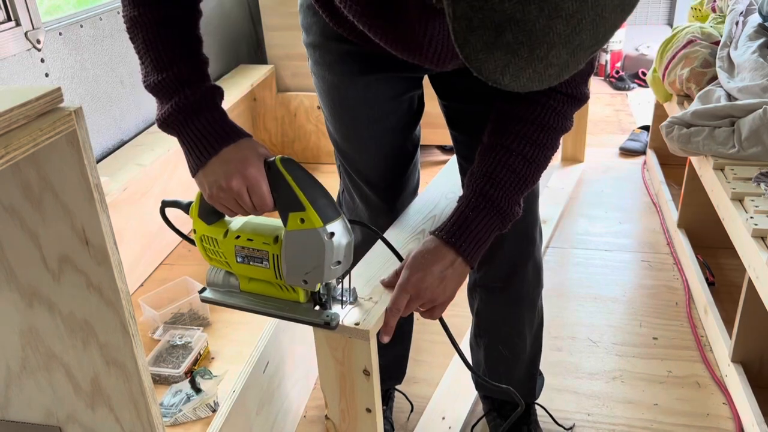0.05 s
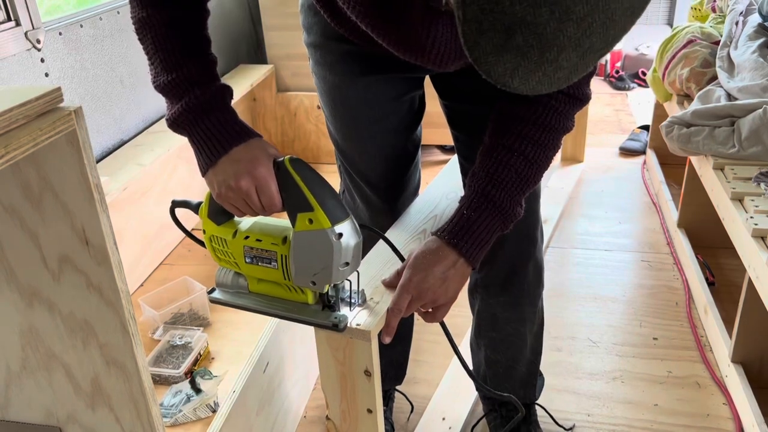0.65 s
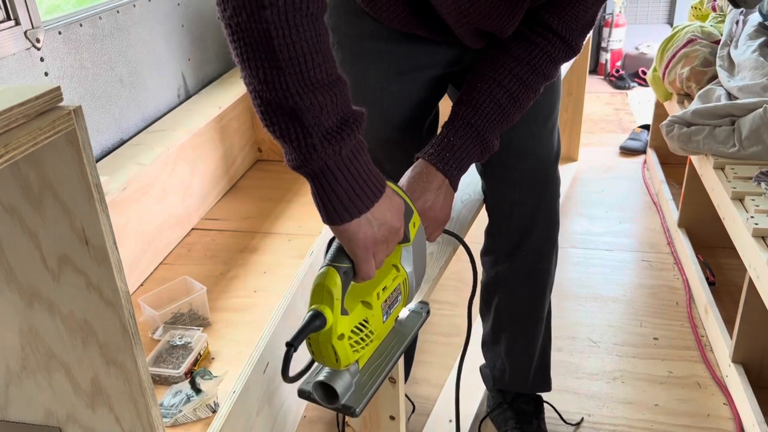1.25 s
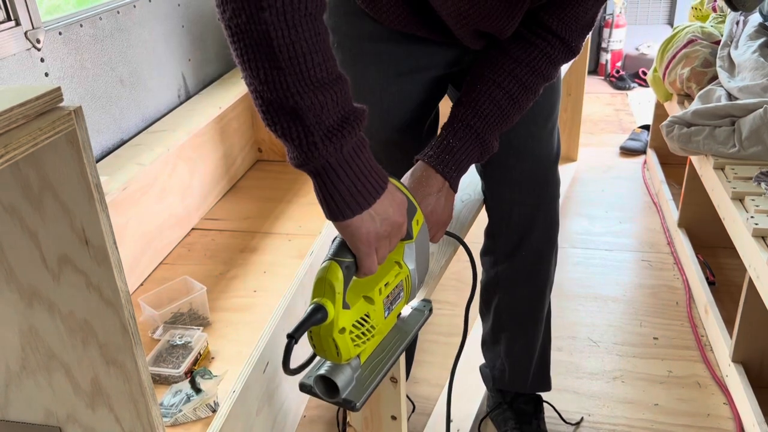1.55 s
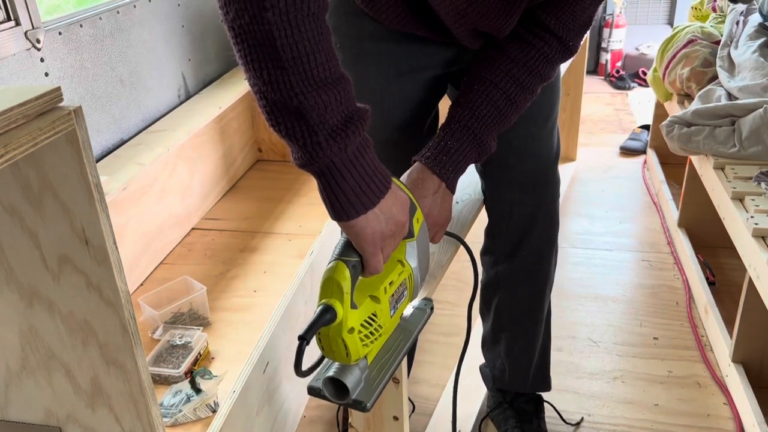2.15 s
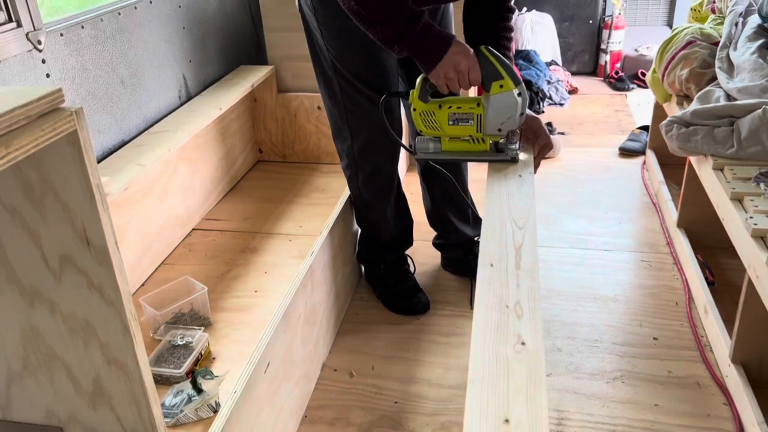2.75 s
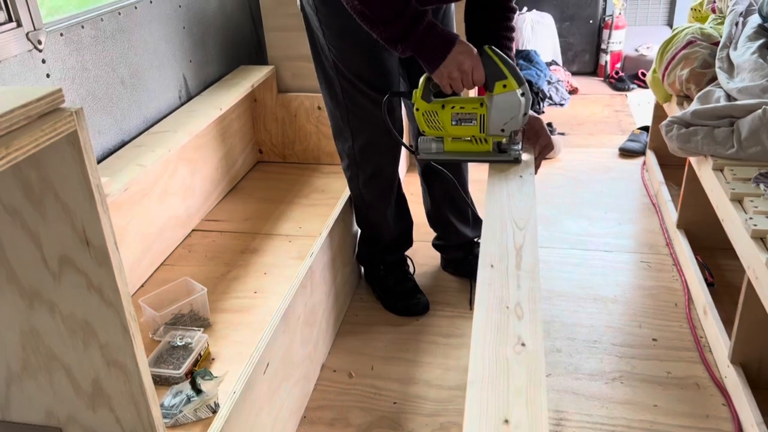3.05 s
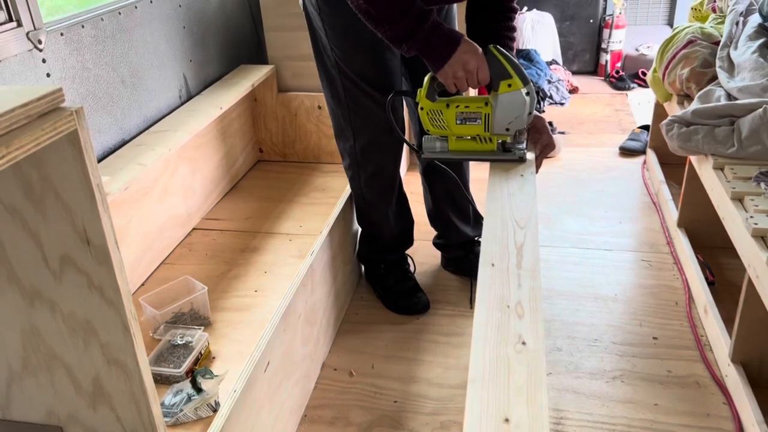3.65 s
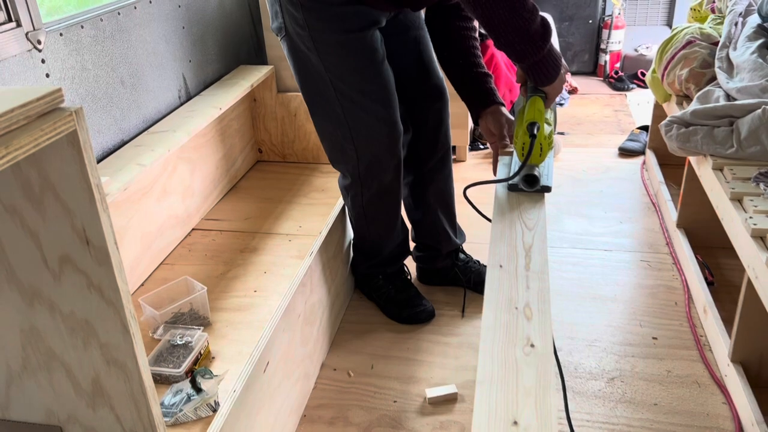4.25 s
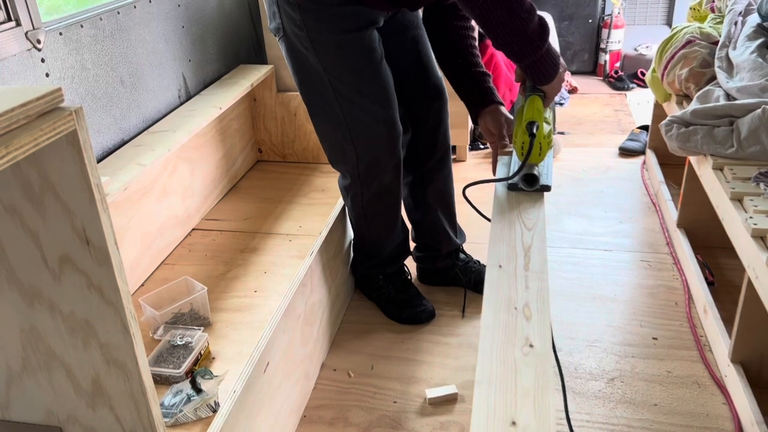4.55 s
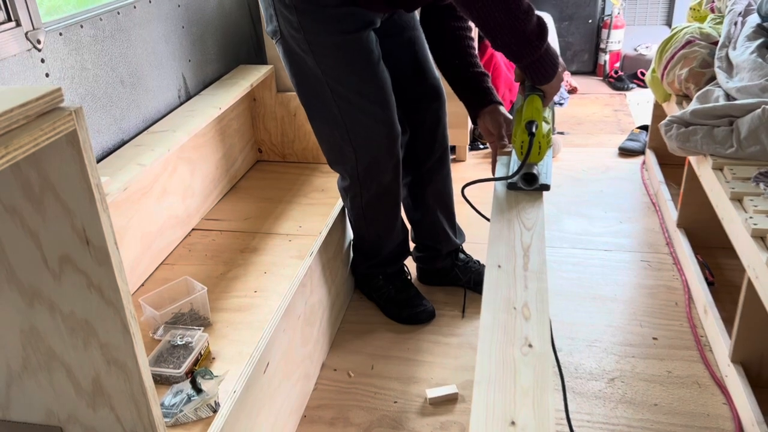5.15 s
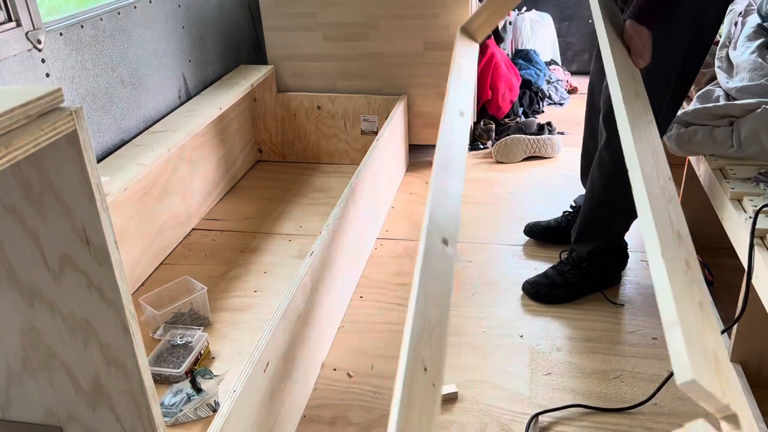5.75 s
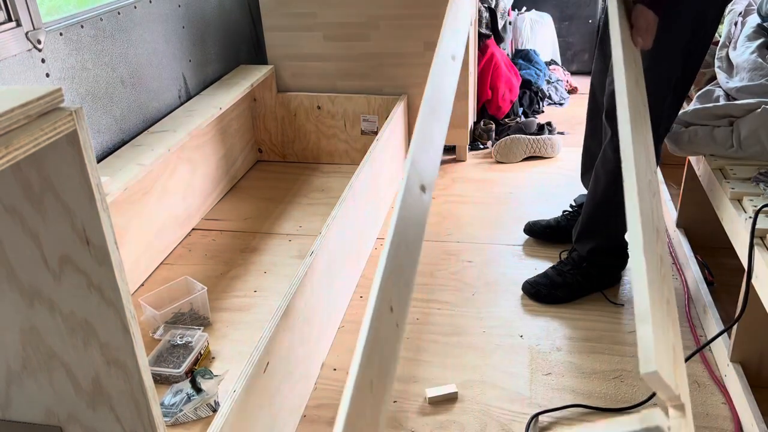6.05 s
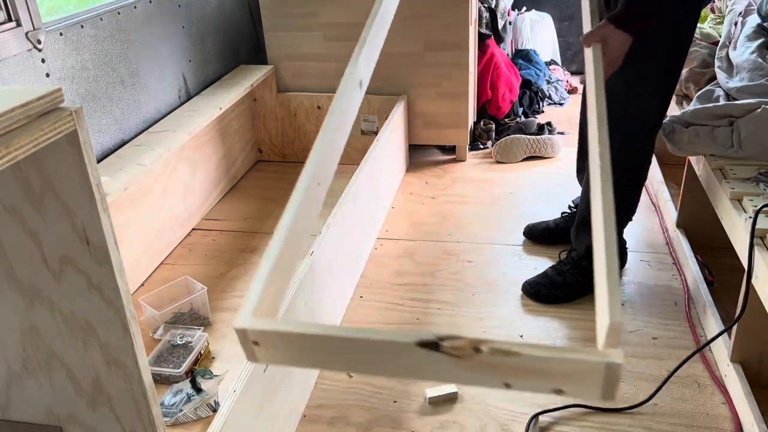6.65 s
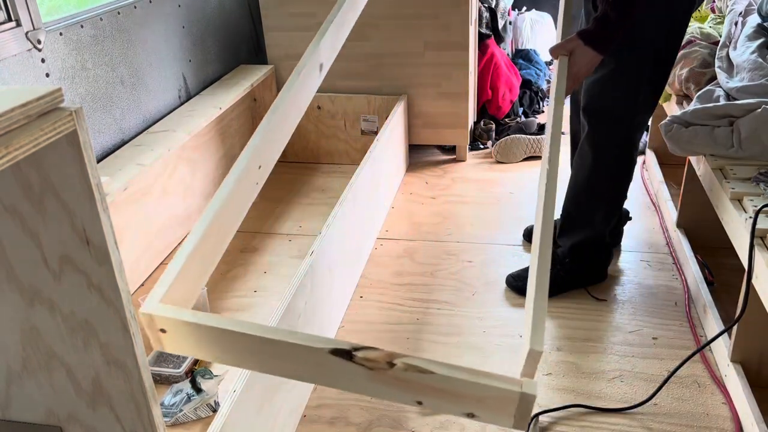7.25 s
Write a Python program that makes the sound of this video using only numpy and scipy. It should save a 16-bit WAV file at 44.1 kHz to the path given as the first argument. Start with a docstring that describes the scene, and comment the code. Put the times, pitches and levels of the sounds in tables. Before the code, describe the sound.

An electric jigsaw cuts a board with a rattling whine, stops, and wood slides and bumps against wood indoors.

```python
"""A corded jigsaw buzzes through softwood in a small plywood-lined room, in four stretches joined by short
fades. Each stroke of the blade rattles the drive and shakes the board; the teeth rasp, the fan hisses
and the motor whines. Then a wooden frame is slid and lifted: it scuffs and creaks as wood rubs on wood,
thuds on the hollow floor and knocks against the woodwork."""
import sys
import numpy as np
from scipy import signal
from scipy.fft import rfft, irfft
from scipy.io import wavfile
from scipy.ndimage import uniform_filter1d

SR = 44100
rng = np.random.default_rng(int(sys.argv[2]) if len(sys.argv) > 2 else 0)


def master_out(mix):
    """Clip the mix to full scale and print it as 16-bit PCM to the path in sys.argv[1]."""
    frames = np.transpose(np.atleast_2d(mix))
    ceiling = np.clip(frames, -1, 1)
    pcm = np.round(ceiling * 32767).astype(np.int16)
    wavfile.write(sys.argv[1], SR, pcm)


N = 326340
T = np.arange(N) / SR

# tones of the motor: multiple of its spin rate, then peak_db in each of the four stretches
MOTOR_TONES = [(4, -46, -34, -38, -39), (8, -56, -43, -43, -45), (16, -43, -30.5, -36.5, -38),
               (24, -38, -42, -47, -43), (30, -33.5, -38, -35, -35)]


def undb(db):
    """Turn decibels into a gain."""
    return 10 ** (np.asarray(db) / 20)


def unit(x):
    """Scale a sound to an average (rms) level of 1."""
    return x / np.sqrt(np.mean(x ** 2) + 1e-20)


def colour(x, points):
    """Shape the tone with a curve of (pitch_hz, level_db) points."""
    hz, db = np.transpose(points)
    bins_hz = np.maximum(np.arange(len(x) // 2 + 1) * SR / len(x), 1)
    return irfft(rfft(x) * undb(np.interp(np.log(bins_hz), np.log(hz), db)), len(x))


def band(x, hz, kind, order=2):
    """Keep the lows, the highs or a band in between."""
    return signal.sosfilt(signal.butter(order, np.clip(hz, 10, .45 * SR), kind, fs=SR, output="sos"), x)


def drift(rate_hz):
    """A smooth random wander, roughly 1 either way."""
    hold = int(SR / rate_hz)
    steps = np.repeat(rng.standard_normal(N // hold + 1), hold)
    return 1.3 * uniform_filter1d(steps, hold)[:N]


def bump(middle_s, half_width_s):
    """A smooth rise to 1 and back."""
    return np.exp(-((T - middle_s) / half_width_s) ** 2)


def dense_ring(ring_s):
    """Countless overlapping tones ring like noise, falling 60 dB in ring_s."""
    t = T[:SR // 2]
    ring = rng.standard_normal(len(t)) * undb(-60 * t / ring_s)
    return ring / np.linalg.norm(ring)


def clear_ring(tones):
    """A few clear tones ring, each falling 60 dB in its ring_s."""
    t = T[:SR]
    ring = sum(undb(db - 60 * t / ring_s) * np.sin(2 * np.pi * (hz * t + rng.random()))
               for hz, db, ring_s in tones)
    return ring / np.linalg.norm(ring)


def through(x, ring):
    """Let x set something ringing."""
    return signal.oaconvolve(x, ring)[:len(x)]


def strokes(turns, share, jitter_s, scatter_db):
    """One slightly uneven blow per stroke, a given share of the way in; turns counts the strokes."""
    times = np.interp(np.arange(int(turns[-1]) - 1) + share, turns, T)
    late, size = rng.standard_normal((len(times), 2)).T
    blows = np.zeros(N)
    blows[np.clip((times + jitter_s * late) * SR, 0, N - 1).astype(int)] = undb(scatter_db * size)
    return blows


def shoe_slaps(turns):
    """The shoe, the saw's base plate, slaps the board dully twice a stroke."""
    # slaps: share_of_stroke, level_db
    slaps = [(.15, -5), (.62, -1.5)]
    blows = sum(undb(db) * strokes(turns, share, jitter_s=.0002, scatter_db=3) for share, db in slaps)
    return unit(band(blows, [180, 520], "band"))


def rattle(turns, ring_s=0.045):
    """Each impact rings its own part of saw and board; the ring changes as the blade travels."""
    # blade reversals, shoe slap and loose gears: share_of_stroke, level_db
    impacts = [(.05, -3.5), (0.239, -10), (.43, -6), (.58, -11.5), (.8, -4.5)]
    out = 0
    for share, db in impacts:
        blows = undb(db) * strokes(turns, share, jitter_s=.00004, scatter_db=2)
        blend = drift(3.5) + T
        for weight in (np.cos(blend), np.sin(blend)):
            out = out + through(blows * weight, dense_ring(ring_s))
    return unit(out)


def rasp(turns, grain_db=2.5, return_stroke=0.76, snaps_per_s=4500, ring_s=0.0082):
    """Teeth snap wood fibres in tiny bursts, hardest where the blade moves fastest on the upstroke."""
    drag, chatter_db = .5, 1.5
    blade = np.sin(2 * np.pi * turns)
    bite = (drag + np.maximum(blade, -return_stroke * blade)) * undb(chatter_db * drift(45))
    snaps = (rng.random(N) < snaps_per_s / SR) * undb(grain_db * np.minimum(rng.exponential(size=N), 4))
    decay = np.exp(-2 * np.log(1000) / (ring_s * SR))
    power = signal.lfilter([1], [1, -decay], (snaps * bite) ** 2)
    return unit(np.sqrt(power) * rng.standard_normal(N))


def whine(turns, gear_ratio=31 / 4, flutter_db=2.2):
    """The spinning motor's fluttering tones, one row each, slightly blurred by loose gears."""
    # two tones flare up and sink: middle_s, half_width_s, multiple_16_change_db, multiple_30_change_db
    flares = [(.23, .1, 11, 0), (.44, .12, 15.5, 1), (.88, .12, 0, 4), (1.07, .07, -5, 0),
              (1.26, .05, 6.5, 3), (1.36, .05, 0, 11), (1.53, .1, 6, 2), (2.12, .08, 2.5, 0),
              (2.5, .07, 0, 11), (3.65, .33, 0, 6.5), (4.62, .15, 7, 6), (5.33, .25, 1, 6.5)]
    spins = gear_ratio * turns + .003 * drift(70)
    flare_db = np.zeros((len(MOTOR_TONES), N))
    flare_db[[2, 4]] = sum(np.outer(db, bump(at, half_width)) for at, half_width, *db in flares)
    tones = [np.sin(2 * np.pi * multiple * spins) * undb(flutter_db * drift(110))
             for multiple, *_ in MOTOR_TONES]
    return np.array(tones) * undb(flare_db)


def vent_hiss(fan, teeth, clatter):
    """The fan's rushing air mixes with the treble of the rasp and rattle."""
    # tone of the hiss: pitch_hz, level_db
    hiss_curve = [(3000, -7), (4400, .5), (6100, 2.5), (7200, -2), (8600, 3.5), (9300, 1.5), (10500, -6),
                  (11500, -2.5), (13000, -8), (15500, -8)]
    return unit(band(colour(fan + 0.79 * teeth + 0.13 * clatter, hiss_curve), 4400, "high"))


def singing(drive, spans, swell_share=0.18, waver_db=1.5):
    """Narrow bands of a driving sound swell, waver and die away, each in its own time span."""
    out = 0
    for start, end, hz, width, db in spans:
        age = (T - start) / (end - start)
        fade = np.clip(np.minimum(age, 1 - age) / swell_share, 0, 1)
        ring = band(drive, [hz - width / 2, hz + width / 2], "band")
        out = out + undb(db + waver_db * drift(15)) * fade * ring / np.std(ring[fade > 0])
    return out


def blade_song(turns):
    """The blade jerks once a stroke and scrapes in between, making itself and the board sing."""
    # ringing of blade and board: start_s, end_s, pitch_hz, width_hz, level_db
    rings = [(-.15, 1, 1230, 110, -28.5), (.3, 1.05, 5770, 240, -32.5), (.95, 1.7, 2535, 55, -27.5),
             (1.0, 1.8, 3050, 70, -29.5), (1.3, 2.7, 3305, 20, -33), (1.4, 2.7, 565, 110, -39),
             (1.33, 1.55, 1430, 120, -25.5), (1.55, 2.05, 1085, 100, -27.5), (1.88, 2.25, 1200, 170, -26.5),
             (2.17, 2.32, 980, 160, -25), (2.2, 2.55, 2510, 160, -30), (2.2, 2.65, 1620, 200, -28),
             (2.45, 4.3, 1165, 55, -28.5), (3.33, 3.49, 1570, 200, -24.5), (3.35, 3.65, 2230, 170, -31),
             (3.58, 3.8, 1570, 90, -24.5), (4.5, 5.3, 1270, 80, -25.5), (4.45, 5.7, 1340, 25, -28),
             (4.3, 5.4, 3120, 90, -33), (5.38, 5.62, 1380, 420, -23)]
    jerks = unit(strokes(turns, share=.45, jitter_s=.00006, scatter_db=2.5))
    return singing(.8 * jerks + rasp(turns), rings)


def board_shake(turns, tones, deep_db, upper_db, third_db, smear, waver_db=1.4):
    """Every stroke kicks the board once; smear makes its higher tones answer a little later."""
    waves = [undb(db + waver_db * drift(40)) * np.sin(2 * np.pi * (multiple * turns - smear * multiple ** 2))
             for multiple, db in tones]
    upper = (waves[2] * undb(third_db) + sum(waves[3:])) / np.std(sum(waves[2:]))
    return unit(sum(waves[:2])) * undb(deep_db) + upper * undb(upper_db)


def effort(stretch, middle_s, speed_lost):
    """Levels of cutting, hiss and board shake: a slowed blade works less hard, and catches swing them."""
    # each stretch at full speed: cut_db, hiss_db, deep_shake_db, upper_shake_db, slope_db_per_s
    levels = [(-17.5, -20.5, -40, -27, -1), (-15, -20, -31.5, -27, -1.96), (-17.5, -25.5, -28.5, -23, 0),
              (-17, -25, -31, -24.5, 0)]
    # the blade catches and the board shifts: middle_s, half_width_s,
    # then changes to cut_db, deep_shake_db, upper_shake_db, third_tone_db
    catches = [(.06, 0.077, 0.5, -2, 1.5, 0), (.12, 0.28, 0, 6, 2, 3), (1.22, 0.39, 0, -1.5, -5, 6.5),
               (1.619, 0.088, 0, 4, 2, -17), (3.42, 0.066, 0.5, -0.5, 0, -1.5),
               (4.36, 0.21, -0.5, 1.5, 2.5, -7), (4.85, 0.22, 0, 3, -3, 4),
               (5.38, 0.055, -1.5, -4, 4, -1.5), (5.49, 0.026, 1, 4, 3, 0)]
    cut_db, hiss_db, deep_db, upper_db, slope = levels[stretch]
    swings = sum(np.outer(db, bump(at, half_width)) for at, half_width, *db in catches)
    cut_swing, deep_swing, upper_swing, third_db = swings
    cut_sag_db, deep_sag_db = 0.8 * speed_lost, 2.5 * speed_lost
    work_db = slope * (T - middle_s) - cut_sag_db
    shake_db = (deep_db - deep_sag_db + deep_swing, upper_db + upper_swing, third_db)
    return cut_db + work_db + cut_swing, hiss_db + work_db, shake_db


def widen(x, width_db=0, walls_ring_s=0.2):
    """Echoes from close walls reach the left and right ears differently."""
    # how much of the echo differs between the ears: pitch_hz, level_db
    width_curve = [(40, -36.5), (90, -16.5), (180, -20.5), (350, -11.5), (700, -3.5), (1400, -9),
                   (2800, -3), (6000, -2.5), (14000, -0.5)]
    side = undb(width_db) * colour(through(x, dense_ring(walls_ring_s)), width_curve)
    return x + side * np.array([[1], [-1]])


def lean_left(ears, pan_db):
    """The vent aims its hiss to the left, so that ear gets more, mostly in the treble."""
    # lean to the left: pitch_hz, multiple of pan_db
    beam = [(60, 0), (300, .7), (2400, .6), (4400, 3.3), (8000, 1), (15000, 0)]
    return np.array([colour(x, [(hz, side * multiple * pan_db / 2) for hz, multiple in beam])
                     for x, side in zip(ears, (1, -1))])


def jigsaw(fade_in_s=0.049, fade_out_s=0.041):
    """Rattle, rasp and fan sound through saw and board, along with the shake, slaps and whine."""
    # the motor slows whenever the blade is pushed in: time_s, strokes_per_s
    speeds = [(0, 49.7), (.15, 48.8), (.35, 48.65), (.72, 49.1), (.9, 49.95), (1.03, 48.6), (1.3, 50.67),
              (1.5, 51.4), (1.75, 51.66), (2.57, 51.46), (2.58, 50.9), (3.1, 50.75), (3.6, 50.69),
              (4.14, 50.82), (4.15, 49.35), (4.45, 51.15), (4.8, 51.62), (5.3, 51.46), (5.5, 51.68)]
    # stretches of sawing: start_s, end_s, rattle_db, rasp_db, fan_db, shoe_db, smear_cycles, pan_db
    stretches = [(-.05, 1.021, -1.5, -6, -1.5, -37, 0.081, 3),
                 (1.006, 2.583, -3.5, -8, -5.5, -41.5, 0.099, 1.7),
                 (2.575, 4.149, 2, -1.5, -4, -40, 0.0246, 0.5),
                 (4.141, 5.583, -2.5, -5, -5.5, -48, 0.1, 0.9)]
    # tone of saw and board, one list per stretch: pitch_hz, level_db
    body_curves = [
        [(300, -10), (520, -10), (610, -13.5), (720, -5), (870, -7), (1020, -3.5), (1300, -4), (1590, -7),
         (2690, -8), (3060, -7), (3550, -8.5), (5500, -5)],
        [(300, -11.5), (480, -12.5), (570, -8), (840, -3), (970, 2), (1300, -1.5), (1610, -1), (1820, -1),
         (2010, -5), (2550, -1.5), (2800, -5), (3060, -2), (3550, -4), (4340, 0), (5500, -6)],
        [(300, -16), (440, -21), (530, -10.5), (670, -13.5), (1020, -4.5), (1270, -4.5), (1590, -4.5),
         (1800, -4.5), (2050, -8.5), (2240, -4.5), (2500, -11), (2770, -6), (3000, -8), (3360, -9),
         (5500, -3.5)],
        [(300, -21.5), (370, -14.5), (520, -13.5), (850, -11), (930, -5.5), (1480, -4.5), (1620, -3.5),
         (1850, -4.5), (2740, -9), (3120, -5), (3480, -10), (3960, -5.5), (5500, -4)],
    ]
    # tones of the shaking board, one list per stretch: multiple of the stroke rate, level_db
    shake_tones = [
        [(1, -28), (2, -30), (3, -4.5), (4, -18), (5, -5)],
        [(1, -3.5), (2, -5), (3, 5), (4, 5), (5, -7.5)],
        [(1, -7), (2, -14.5), (3, 4.5), (4, -2), (5, 1.5), (6, -11.5), (7, -30), (8, -20), (11, -4)],
        [(1, -14), (2, -14), (3, 4.5), (4, 4.5), (5, 0.5), (7, -12.5), (8, -18)],
    ]
    speed = np.interp(T, *np.transpose(speeds))
    turns = np.cumsum(speed) / SR
    slaps, clatter, teeth = shoe_slaps(turns), rattle(turns), rasp(turns)
    fan, motor = rng.standard_normal(N), whine(turns)
    hiss, song = vent_hiss(fan, teeth, clatter), blade_song(turns)
    motor_db = np.transpose(MOTOR_TONES)[1:]
    out = 0
    for i, (start, end, rattle_db, rasp_db, fan_db, shoe_db, smear, pan_db) in enumerate(stretches):
        cut_db, hiss_db, shake_db = effort(i, (start + end) / 2, speed.max() - speed)
        body = undb(rattle_db) * clatter + undb(rasp_db) * teeth + undb(fan_db) * fan
        body = band(colour(body, body_curves[i]), 160, "high")
        body = unit(band(body, 3320, "low", order=3))
        saw = body * undb(cut_db) + hiss * undb(hiss_db) + slaps * undb(shoe_db) + song
        saw = saw - board_shake(turns, shake_tones[i], *shake_db, smear) + undb(motor_db[i]) @ motor
        fade = np.clip((T - start) / fade_in_s, 0, 1) * np.clip((end - T) / fade_out_s, 0, 1)
        out = out + lean_left(widen(saw), pan_db) * fade
    return out


def room_hush(level_db=-65):
    """The faint, low, steady noise of the room."""
    # tone of the hush: pitch_hz, level_db
    hush_curve = [(30, -2.5), (400, -20.5), (1500, -24.5), (5000, -31), (14000, -49)]
    return unit(colour(rng.standard_normal(N), hush_curve)) * undb(level_db)


def push(start, end, rise_s=0.029, fall_db_per_s=159):
    """Loudness of one push: a quick rise, a hold and a steady fall."""
    return np.clip((T - start) / rise_s, 0, 1) * undb(-fall_db_per_s * np.maximum(T - end, 0))


def sliding(grain_db=1.0):
    """The frame rubs wood on wood, catching unevenly on the grain."""
    # pushes of the frame: start_s, end_s, hiss_db, scuff_db
    pushes = [(5.54, 5.68, -66, -56), (5.682, 5.763, -58.5, -52.5), (5.96, 6.097, -68, -70),
              (6.04, 6.097, -68, -57), (6.113, 6.372, -48, -76), (6.307, 6.415, -66, -52),
              (6.604, 6.66, -60.5, -66), (6.697, 6.783, -51, -44), (6.829, 6.866, -53, -49.5),
              (7.05, 7.33, -81, -69.5)]
    # tone of the bright hiss and of the low scuff: pitch_hz, level_db
    hiss_curve = [(1500, -7), (3300, -3), (5800, 2), (8500, -2), (12000, -19), (15500, -28)]
    scuff_curve = [(60, -15.5), (220, -8.5), (330, -11.5), (520, -11), (900, -18.5), (1500, -15.5),
                   (3500, -23), (6000, -39.5)]
    power = sum(np.outer(undb(db), push(start, end)) ** 2 for start, end, *db in pushes)
    hiss_gain, scuff_gain = np.sqrt(power)
    hiss = unit(colour(rng.standard_normal(N), hiss_curve)) * hiss_gain
    scuff = unit(colour(rng.standard_normal(N), scuff_curve)) * scuff_gain
    return (hiss + scuff) * undb(grain_db * drift(180))


def thuds(floor_db=25):
    """Blows give short, dry booms in the hollow floor; the last ones are deepest and dullest."""
    # blows on the floor: start_s, strength_db, highest_hz
    blows = [(5.725, -40, 696), (6.738, -30.5, 700), (6.786, -29, 500), (6.919, -41, 200),
             (7.105, -38.5, 300), (7.128, -30.5, 350), (7.15, -34.5, 170), (7.194, -28.5, 89.6),
             (7.234, -41, 80.6)]
    # tones of the floor: pitch_hz, level_db, ring_s
    floor_tones = [(55, -6, 0.26), (78.5, 0, 0.26), (120.5, -6, 0.1), (172, 3, 0.11), (290, -1, 0.06),
                   (375, -2, .06)]
    force = sum(undb(db + floor_db) * band(signal.unit_impulse(N, int(start * SR)), top_hz, "low")
                for start, db, top_hz in blows)
    return through(force, clear_ring(floor_tones))


def contact(start, low_hz, high_hz, length_s, tap=.35, rise_share=.3):
    """Wood meets wood: a small tap, then a crunch of fibres that builds and dies."""
    age = np.maximum(T - start, 0) / length_s
    force = rng.standard_normal(N) * (1 - np.exp(-age / rise_share)) * np.exp(-age)
    force = force / np.linalg.norm(force)
    force[int(start * SR)] += tap
    force = band(force + 1e-18, [low_hz, high_hz], "band")
    return force / np.linalg.norm(force)


def knocks(tones_db=13, body_db=16, crack_db=15):
    """Each hit cracks, ringing the frame's clear tones and the dense ones between them."""
    # hits on the frame: start_s, strength_db, lowest_hz, highest_hz, length_s
    hits = [(5.738, -38, 1100, 2390, 0.028), (6.044, -43, 600, 3500, 0.0027),
            (6.063, -39, 2300, 3340, 0.0033), (6.365, -30, 850, 1910, 0.013),
            (6.714, -25, 1010, 1610, 0.007), (6.717, -20, 422, 590, 0.0057),
            (6.723, -18, 900, 2210, 0.0054), (6.729, -16.5, 900, 3600, 0.0076),
            (6.728, -21, 400, 610, 0.0045), (6.735, -20.5, 1200, 9100, 0.0075),
            (6.752, -28, 250, 1600, 0.0097), (6.766, -27.5, 300, 3000, 0.0074),
            (6.876, -40, 1000, 1810, 0.0054), (6.932, -46.5, 620, 850, .003),
            (7.093, -45, 686, 2600, 0.0085), (7.124, -34.5, 510, 1590, 0.0017)]
    # tones of the frame: pitch_hz, level_db, ring_s
    frame_tones = [(302, -5, .09), (356, -5, .08), (455, 6, 0.07), (520, 3, .04), (555, 1, 0.045),
                   (978, -5, .06), (1098, 3, 0.06), (1184, 1, 0.08), (1424, 0, 0.06), (1734, -1, 0.08),
                   (2290, -4, 0.06), (2870, -7, .06), (3320, -5, 0.06)]
    force = sum(undb(db) * contact(start, *shape) for start, db, *shape in hits)
    body = band(through(force, dense_ring(ring_s=0.11)), 400, "high")
    tones = through(force, clear_ring(frame_tones))
    return undb(tones_db) * tones + undb(body_db) * body + undb(crack_db) * force


def creaks():
    """Rubbing wood creaks in short, narrow bands of noise."""
    # creaks: start_s, end_s, pitch_hz, width_hz, level_db
    spans = [(6.45, 6.533, 450, 200, -58), (6.645, 6.73, 1160, 900, -53), (6.922, 6.975, 704, 170, -56),
             (7.178, 7.348, 950, 380, -65)]
    return singing(rng.standard_normal(N), spans)


def scene(room_db=-15, room_ring_s=0.21, frame_pan_db=2.3):
    """The saw, then the frame a little to the left, in a small quiet room."""
    wood = knocks() + thuds() + creaks()
    wood = wood + undb(room_db) * through(wood, dense_ring(room_ring_s))
    hush = room_hush()
    ear_gains = undb(np.array([[frame_pan_db], [-frame_pan_db]]) / 2)
    return jigsaw() + widen(wood + sliding() + hush, width_db=1) * ear_gains


def record(dry, top_hz=16000):
    """Clip the sound at full scale and cut the highest treble."""
    return signal.sosfilt(signal.ellip(10, .2, 75, top_hz, fs=SR, output="sos"), np.clip(dry, -1, 1))


dry = scene()
out = record(dry)
master_out(out)
```